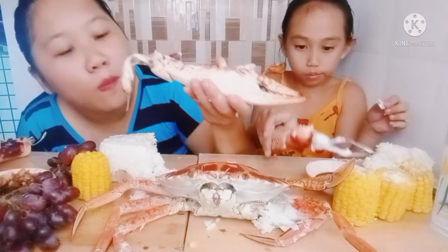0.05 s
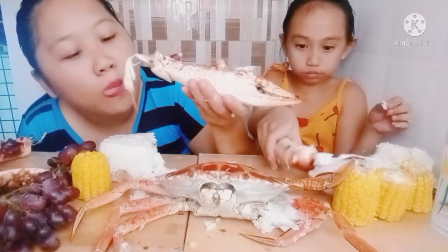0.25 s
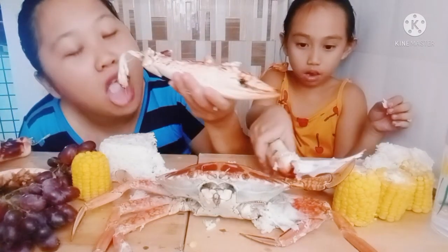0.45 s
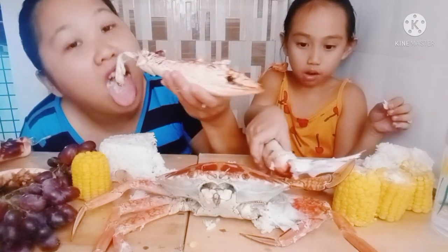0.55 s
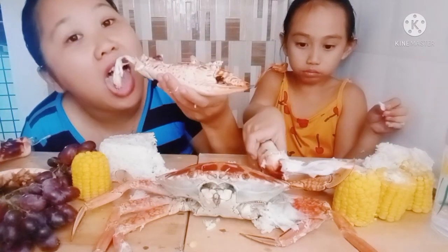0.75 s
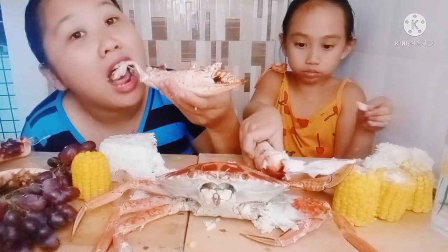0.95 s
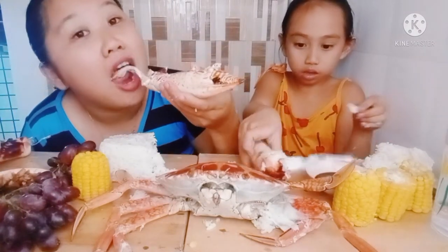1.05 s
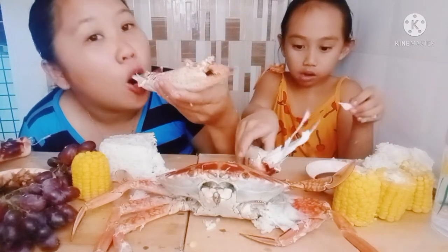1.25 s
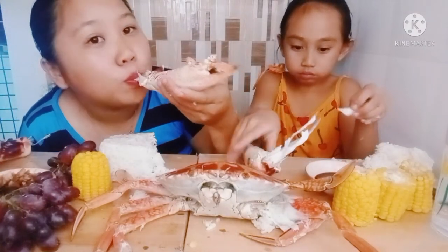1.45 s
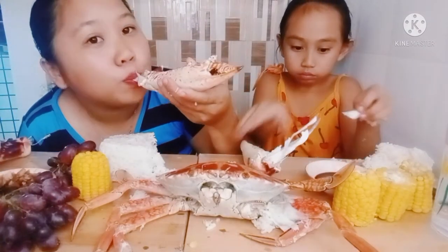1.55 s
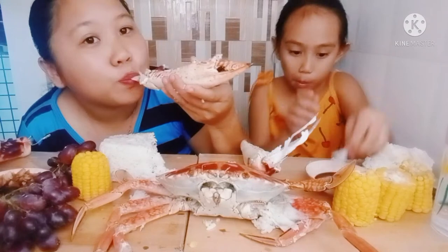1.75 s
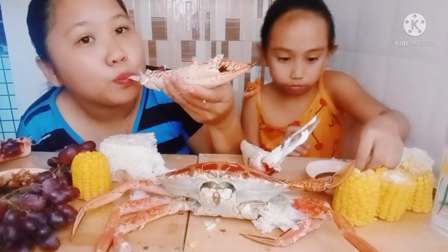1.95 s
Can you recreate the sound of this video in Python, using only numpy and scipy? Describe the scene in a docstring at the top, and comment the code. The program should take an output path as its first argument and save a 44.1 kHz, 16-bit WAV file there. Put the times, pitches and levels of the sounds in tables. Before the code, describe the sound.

A crab claw splits with one loud, dry crack near the start, ringing briefly off table and steel; small shell snaps, soft wooden bumps and very faint sucking follow, close up in a small hard-walled room.

```python
"""Eating crab at a table

Crab is eaten at a wooden table in a small hard-walled room. A hard blow, three quick cracks of noise, splits
a claw; fading tones make the claw, the table top and a steel utensil ring with it. Then shell snaps (ticks
with a ringing band of noise) and crackles (showers of random grains), and soft bumps wake the table's low
tones. Fluttering noise and thin squeaks are meat sucked from a leg, and short bright noises are wet lips.
Underneath lie a thin high hiss, a room rumble and two wavering low hums.
"""
import sys
import numpy as np
from scipy import signal
from scipy.fft import rfft, irfft, next_fast_len
from scipy.io import wavfile
from scipy.ndimage import map_coordinates

SR = 44100
rng = np.random.default_rng(int(sys.argv[2]) if len(sys.argv) > 2 else 0)


def waveform_to_disk(signal):
    """Save audio, clipped to [-1, 1], as 16-bit WAV at the path in sys.argv[1]."""
    frames = np.transpose(np.atleast_2d(signal))
    scaled = np.clip(frames, -1, 1) * 32767
    samples = np.round(scaled).astype(np.int16)
    wavfile.write(sys.argv[1], SR, samples)


N = 88200  # samples, two seconds

# Quick cracks of the hard blow. Each row: start in seconds, level in dB.
BLOW_CRACKS = [(0.2302, -13.5), (0.2334, -15.5), (0.2402, -18.5)]
# Tones of the claw and table top. Each row: pitch in Hz, relative level in dB, time to fall 60 dB in seconds.
CLAW_AND_TABLE_TONES = [(240, -22, .17), (465, -20, .22), (542, -11, .1), (718, -3, .085), (775, -11, .07),
                        (916, -8, .21), (982, -1, .105), (1047, -8, .085), (1115, -3, .075),
                        (1187, -11, .08), (1281, -8, .07), (1665, 3, .04), (1720, -10, .12),
                        (2515, -8, .05)]
# Colour of the splitting shell. Each row: frequency in Hz, relative level in dB per Hz.
CRACK_COLOUR = [(30, -49), (100, -23), (300, -6.5), (600, -11), (1000, -4.5), (1400, -4), (1720, -5.5),
                (2000, -15.5), (2600, -8.5), (3200, -12.5), (3600, -30), (4200, -17.5), (4600, -26.5),
                (5300, -22.5), (6300, -38.5), (7700, -26), (9000, -52), (12500, -67.5), (14600, -58),
                (16000, -74)]
# Tones of the steel utensil; the close pair beats.
# Each row: pitch in Hz, level in dB, time to fall 60 dB in seconds, rise time in seconds.
STEEL_TONES = [(2376, -17, .185, .036), (2391, -20, .185, .036), (4899, -31.5, .175, .01),
               (8000, -39, .135, .001), (11828, -44, .085, .008)]
CRACK_DB, CRACK_T60_S, CRACK_RISE_S = -3, 0.025, 0.0001  # T60 is the time to fall 60 dB
BODY_DB, BODY_RISE_S = -12, 0.0014
BLOW_ROOM_DB = 0.5

# Small snaps of shell. Each row: start in seconds, level in dB, pitch in Hz,
# time for the ring to fall 60 dB in seconds, level of the splinter tick in dB before the snap's own level.
SHELL_SNAPS = [(.4274, -49.5, 3710, 0.044, -20.5), (0.6903, -30.5, 4300, 0.014, -15.5),
               (0.6888, -41.5, 8500, 0.027, -3.5), (.6895, -54, 1350, 0.12, -30),
               (.9877, -57, 4530, 0.097, -16), (0.99, -64, 3170, 0.19, -19),
               (1.0056, -42.5, 5400, 0.09, -5.5), (1.006, -63, 3840, 0.051, -12),
               (1.0935, -53.5, 3820, 0.17, -4), (1.3112, -37, 6840, 0.024, -34),
               (1.3142, -38.5, 6520, 0.11, -45), (1.3115, -55.5, 4070, 0.11, -26)]
# Colour of the splinter tick. Each row: frequency in Hz, relative level in dB per Hz.
SPLINTER_COLOUR = [(200, -11), (800, -53), (1300, 3), (2100, -41), (3400, 6), (5500, 8), (9000, 1.5),
                   (12000, -18), (15000, -18)]
SNAP_HALF_WIDTH_HZ, SNAP_ROOM_DB = 168, -9.5

# Crackling under pressure. Each row: start in seconds, length in seconds, level in dB, centre in Hz.
SHELL_CRACKLES = [(0.409, 0.066, -58, 2400), (0.466, 0.034, -52, 2135), (0.652, 0.04, -62.5, 3360),
                  (0.919, 0.015, -70.5, 2450), (1.004, 0.036, -54.5, 3970), (1.095, 0.054, -61, 2700)]
# Resonances of the bending shell. Each row: frequency in Hz, relative level in dB.
SHELL_RESONANCES = [(500, 5.5), (1150, 8), (1700, 1), (2150, -12.5), (2850, 4), (3300, -6), (3800, 3.5),
                    (4600, -14), (5400, 9.5), (6200, -6), (9000, 12), (12000, -9)]
CRACKLE_OCTAVES, GRAINS_PER_S = 0.62, 1500  # spread around the centre; average grain rate

# Soft bumps on the table. Each row: start in seconds, level in dB,
# corner in Hz above which the bump is dulled, level of the push in dB before the bump's own level.
TABLE_BUMPS = [(0.2215, -44, 400, -1), (0.659, -66, 545, 7), (0.687, -56, 396, 6),
               (0.711, -56.5, 314, -3.5), (0.764, -67.5, 600, 9.5), (1.063, -29.5, 650, -1),
               (1.0668, -34.5, 1090, 3), (1.074, -32.5, 970, -5.5), (1.083, -42.5, 600, 8.5),
               (1.193, -41.5, 440, -2), (1.2150, -34, 250, 3), (1.2235, -43, 262, -7),
               (1.239, -49.5, 410, -3)]
# Tones of the table. Each row: pitch in Hz, relative level in dB, time to fall 60 dB in seconds.
TABLE_TONES = [(78, -6.5, 0.18), (116, -8, 0.25), (229, 1, .11), (330, -4, 0.074), (373.3, -10, 0.048),
               (554.5, -8.5, .08), (710, -0.5, .065), (887, -4.5, .09), (1241, -11.5, 0.086)]
# Colour of the dull push. Each row: frequency in Hz, relative level in dB per Hz.
THUD_COLOUR = [(25, -23.5), (75, -1), (250, 4), (450, -3.5), (900, -3.5), (1400, -14.5), (2000, -29.5),
               (5000, -55.5)]
THUD_T60_S, BUMP_RISE_S, BUMP_ROOM_DB = 0.08, 0.002, -13.5

# Loudness of the sucking. Each row: time in seconds, level in dB.
SUCK_LEVELS = [(.88, -93), (.93, -78), (1.04, -66.5), (1.12, -58), (1.19, -70), (1.25, -76.5), (1.3, -82),
               (1.34, -65.5), (1.44, -88.5), (1.51, -68), (1.545, -67.5), (1.59, -61.5), (1.66, -73.5),
               (1.72, -86), (1.81, -90.5)]
# Resonance of the mouth. Each row: frequency in Hz, relative level in dB per Hz.
MOUTH_COLOUR = [(300, -35), (620, -15.5), (900, -14.5), (1130, -4.5), (1250, -9.5), (1450, -1),
                (1640, -3.5), (1780, -19), (2300, -31.5), (4000, -41)]
# Thin squeaks. Each row: start in seconds, length in seconds, pitch in Hz, level in dB.
LIP_SQUEAKS = [(.91, .13, 1220, -67.5), (1.198, .11, 1470, -63.5), (1.303, 0.086, 1340, -65),
               (1.427, .11, 620, -72), (1.475, 0.066, 1380, -63), (1.512, 0.068, 3310, -76),
               (1.57, 0.15, 1490, -70), (1.718, 0.083, 1650, -67.5), (1.924, .09, 620, -70)]
SQUEAK_WAVER = 0.016  # typical pitch change, as a share of the pitch

# Tiny wet clicks of the lips. Each row: start in seconds, level in dB.
LIP_SMACKS = [(.6895, -62), (.703, -64), (.985, -68.5), (1.007, -62), (1.058, -73), (1.245, -74)]
# Colour of the clicks. Each row: frequency in Hz, relative level in dB per Hz.
SMACK_COLOUR = [(3000, -30), (8000, -3), (12000, -3), (14500, 2), (16000, -4)]
SMACK_T60_S = 0.1

# Colour of the steady hiss. Each row: frequency in Hz, relative level in dB per Hz.
HISS_COLOUR = [(2350, -60.5), (4000, -39), (4640, -30), (5000, -11.5), (5400, -4), (5750, -17.5),
               (6050, -38.5), (6410, -18), (6700, -5), (7050, 6), (7430, -10.5), (7800, -9.5),
               (8500, -17.5), (9100, -10), (9710, -1), (10350, -0.5), (10900, -15), (11500, -38.5),
               (15500, -42.5)]
# Slow change of the hiss. Each row: time in seconds, change in dB.
HISS_SWELL = [(0, 2), (.15, -0.5), (.4, 4), (.6, 0), (.8, 0), (1.1, 4), (1.5, 2.5), (1.75, -0.5), (2, 0.5)]
# Colour of the room rumble. Each row: frequency in Hz, relative level in dB per Hz.
RUMBLE_COLOUR = [(20, -21), (45, -10.5), (70, -1), (110, -3.5), (170, -6), (270, -12.5), (420, -24.5),
                 (560, -23.5), (900, -28.5), (1600, -25.5), (2100, -35), (3100, -31.5), (4200, -40),
                 (8000, -59)]
# Slow change of the rumble. Each row: time in seconds, change in dB.
RUMBLE_SWELL = [(0, -1.5), (.5, -5.5), (.72, -1.5), (1.7, -2), (2, -3)]
HISS_DB, RUMBLE_DB = -60.5, -66
HISS_DRIFT_DB, HISS_SPLIT_HZ = 2.77, 8200  # only the hiss below the split drifts
# Loudness of the low hum. Each row: time in seconds, level in dB.
HUM_LEVELS = [(0, -89), (.6, -74), (0.779, -65.5), (.87, -62.5), (1.05, -56), (1.3, -61), (1.5, -57),
              (1.62, -61), (1.7, -74.5), (2, -65)]
# Loudness of the deep drone. Each row: time in seconds, level in dB.
DRONE_LEVELS = [(0, -82.5), (0.499, -91.5), (.72, -64), (1, -71.5), (1.6, -63), (1.74, -71), (1.809, -62),
                (2, -62.5)]
HUM_HZ, DRONE_HZ = 119, 63

# How long the room rings. Each row: frequency in Hz, time to fall 60 dB in seconds.
ROOM = [(100, 0.36), (300, .23), (700, .22), (1800, .24), (4800, 0.2), (9000, 0.35), (14000, 0.17)]
LOW_CUT_HZ, TOP_HZ = 50, 15560


def amp(db):
    """Turn dB into a plain multiplier."""
    return 10 ** (np.asarray(db) / 20)


def unit(x):
    """Scale a sound to an rms (average strength) of 1."""
    return x / np.sqrt(np.mean(x ** 2) + 1e-20)


def along(points, hz):
    """Read a table of (Hz, value) rows at any frequency, on a log axis."""
    f, v = np.transpose(points)
    return np.interp(np.log(hz + 1), np.log(f + 1), v)


def curve(rows):
    """Join (time, value) rows with straight lines, one value per sample."""
    return np.interp(np.arange(N) / SR, *np.transpose(rows))


def wobble(rate):
    """A smooth random curve through `rate` random points a second."""
    knots = rng.standard_normal(int(N * rate / SR) + 4)
    return map_coordinates(knots, [np.arange(N) * rate / SR])


def filtered(x, response):
    """Multiply the spectrum of x by a response that depends on frequency."""
    m = next_fast_len(len(x) + SR // 4)  # spare room at the end
    spectrum = rfft(x, m) * response(np.fft.rfftfreq(m, 1 / SR))
    return irfft(spectrum, m)[:len(x)]


def noise(colour, size):
    """Random noise with the given colour and an rms of 1."""
    return unit(filtered(rng.standard_normal(size), lambda hz: amp(along(colour, hz))))


def ring(tones, t):
    """A struck object: a sum of pure tones, each dying away at its own speed."""
    return sum(amp(db - 60 * t / t60) * np.sin(2 * np.pi * hz * t) for hz, db, t60 in tones)


def add(track, s, sound):
    """Lay a sound into a track, starting at s seconds."""
    part = track[round(s * SR):][:len(sound)]
    part += sound[:len(part)]


def room(x, wet_db):
    """Add the answer of the walls: a fresh noise tail whose pitches fade at different speeds."""
    hz, t, z = signal.stft(rng.standard_normal(SR // 2), SR, nperseg=256)
    fade = amp(-60 * t / along(ROOM, hz)[:, None])
    tail = signal.istft(z * fade, SR, nperseg=256)[1]
    tail *= 1 - np.exp(-(np.arange(len(tail)) / SR / 0.002) ** 2)  # builds up over about 2 ms
    walls = signal.fftconvolve(x, tail / np.linalg.norm(tail))[:len(x)]
    return x + amp(wet_db) * walls


def blow():
    """The shell gives way in quick noisy steps; claw, table and steel ring from the first one."""
    out, t = np.zeros(N), np.arange(SR // 2) / SR
    for s, db in BLOW_CRACKS:
        fade = amp(CRACK_DB - 60 * t / CRACK_T60_S)
        rise = 1 - np.exp(-(t / CRACK_RISE_S) ** 2)
        crack = fade * noise(CRACK_COLOUR, len(t)) * rise
        add(out, s, amp(db) * room(crack, BLOW_ROOM_DB))
    first = BLOW_CRACKS[0][0]
    body = amp(BODY_DB) * ring(CLAW_AND_TABLE_TONES, t) * (1 - np.exp(-t / BODY_RISE_S))
    add(out, first, room(body, wet_db=-9))
    steel = sum(ring([(hz, db, t60)], t) * (1 - np.exp(-t / rise)) for hz, db, t60, rise in STEEL_TONES)
    add(out, first, room(steel, wet_db=-13))
    return out


def snaps():
    """Each splinter ticks, and rings as a narrow band of noise around its own pitch."""
    out, t = np.zeros(N), np.arange(SR // 3) / SR
    for s, db, hz, t60, splinter_db in SHELL_SNAPS:
        resonance = lambda f: 1 / (1 + ((f - hz) / SNAP_HALF_WIDTH_HZ) ** 2)
        band = unit(filtered(rng.standard_normal(len(t)), resonance))
        tone = band * amp(-3.5 - 60 * t / t60) * (1 - np.exp(-t / 0.00025))
        tick = amp(splinter_db - 60 * t / 0.018) * noise(SPLINTER_COLOUR, len(t))
        add(out, s, amp(db) * room(tone + tick, SNAP_ROOM_DB))
    return out


def crackles():
    """Showers of tiny fractures, coloured by the shell, swell and fade as it bends."""
    out, t = np.zeros(N), np.arange(SR // 4) / SR
    for s, length, db, centre in SHELL_CRACKLES:
        grains = rng.standard_normal(len(t)) * (rng.random(len(t)) < GRAINS_PER_S / SR)

        def colour(hz):
            """The shell's resonances, weakening away from the centre."""
            octaves = np.log2((hz + 1) / centre)
            return amp(along(SHELL_RESONANCES, hz)) * np.exp(-0.5 * (octaves / CRACKLE_OCTAVES) ** 2)

        swell = abs(np.sin(np.pi * np.minimum(t / length, 1)))
        add(out, s, amp(db) * unit(filtered(grains, colour)) * swell)
    return room(out, wet_db=-7)


def bumps():
    """Soft contacts push dully and wake mostly the low tones of the table."""
    out, t = np.zeros(N), np.arange(SR // 3) / SR
    for s, db, corner, push_db in TABLE_BUMPS:
        thud = amp(push_db - 60 * t / THUD_T60_S) * noise(THUD_COLOUR, len(t))
        contact = (ring(TABLE_TONES, t) + thud) * (1 - np.exp(-t / BUMP_RISE_S))
        dulling = signal.butter(2, corner, fs=SR)
        add(out, s, amp(db) * signal.lfilter(*dulling, contact))
    return room(out, BUMP_ROOM_DB)


def sucking():
    """Juice drawn from the leg flutters in the mouth's resonance; the lips squeak in wavering tones."""
    out = noise(MOUTH_COLOUR, N) * amp(curve(SUCK_LEVELS) + wobble(54))
    for s, length, hz, db in LIP_SQUEAKS:
        swell = np.sin(np.pi * np.clip((np.arange(N) / SR - s) / length, 0, 1))
        pitch = hz * (1 + SQUEAK_WAVER * wobble(83))
        phase = 2 * np.pi * np.cumsum(pitch) / SR
        out += amp(db + 4.1 * wobble(70.33)) * swell * np.sin(phase)
    return out


def smacks():
    """Airy clicks of wet lips: bright noise that starts at once and dies away."""
    out, t = np.zeros(N), np.arange(SR // 5) / SR
    for s, db in LIP_SMACKS:
        add(out, s, noise(SMACK_COLOUR, len(t)) * amp(db - 60 * t / SMACK_T60_S))
    return out


def hum(hz, levels):
    """A low pure tone that wavers in pitch and level."""
    phase = 2 * np.pi * np.cumsum(hz * (1 + 0.025 * wobble(39))) / SR
    tone = np.sqrt(2) * np.sin(phase)  # rms of 1
    return tone * amp(curve(levels) + wobble(54))


def background():
    """Thin coloured hiss whose lower band drifts in level, a room rumble and two low hums."""
    hiss = noise(HISS_COLOUR, N) * amp(HISS_DB + curve(HISS_SWELL) + 0.51 * wobble(25))
    lower = filtered(hiss, lambda hz: 1 / (1 + (hz / HISS_SPLIT_HZ) ** 20))
    upper = hiss - lower
    hiss = upper + lower * amp(HISS_DRIFT_DB * wobble(35))
    rumble = noise(RUMBLE_COLOUR, N) * amp(RUMBLE_DB + curve(RUMBLE_SWELL) + 0.99 * wobble(10))
    return hiss + rumble + hum(HUM_HZ, HUM_LEVELS) + hum(DRONE_HZ, DRONE_LEVELS)


def scene():
    """Everything at the table, added together in one channel."""
    eating = blow() + snaps() + crackles() + bumps() + sucking() + smacks()
    return (eating + background())[None]


def record(dry):
    """The recorder weakens the deepest bass and keeps nothing above its top frequency."""
    thin = signal.lfilter(*signal.butter(2, LOW_CUT_HZ, "highpass", fs=SR), dry)
    return np.array([filtered(x, lambda hz: hz < TOP_HZ) for x in thin])


dry = scene()
out = record(dry)
waveform_to_disk(out)
```